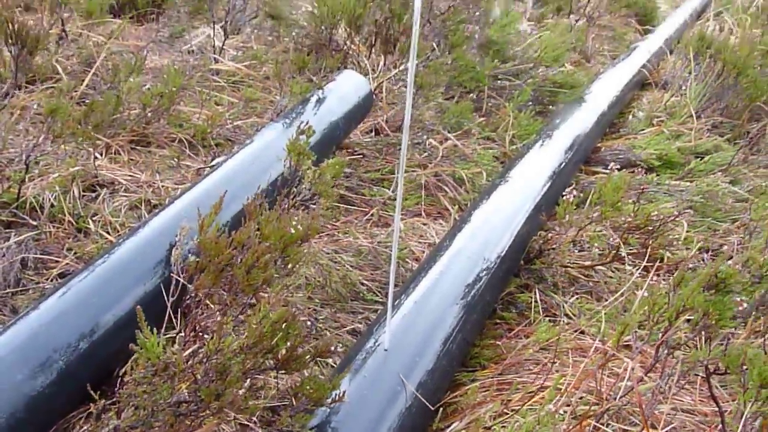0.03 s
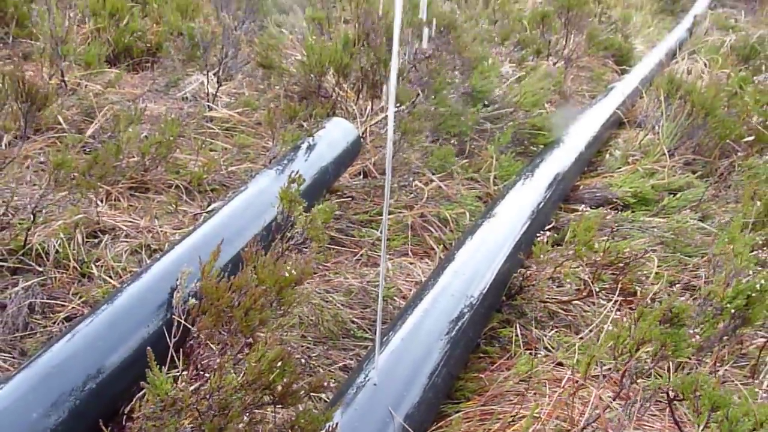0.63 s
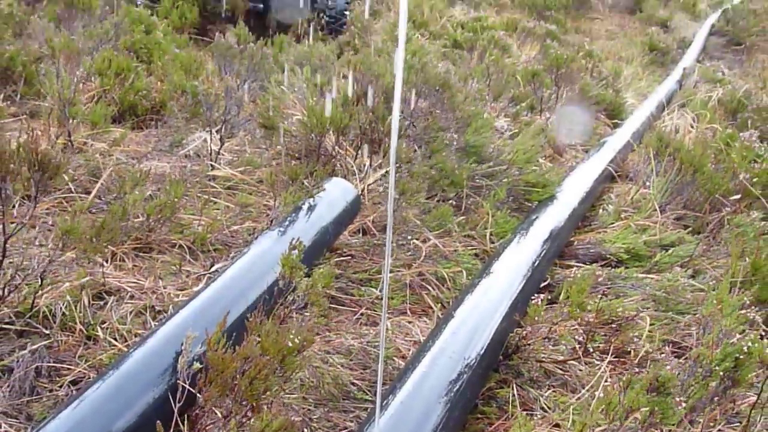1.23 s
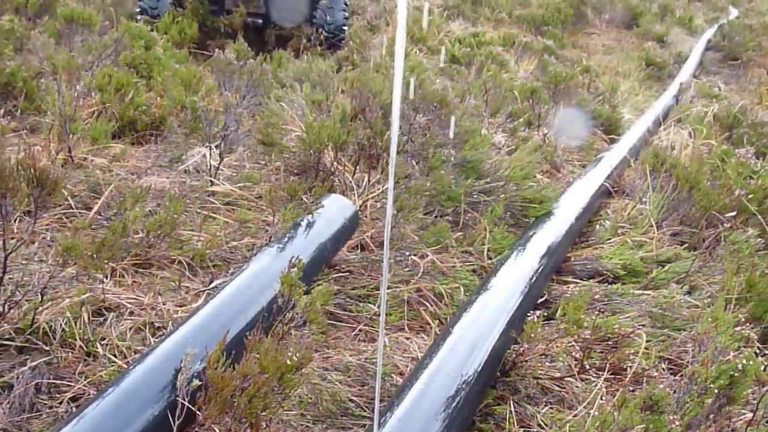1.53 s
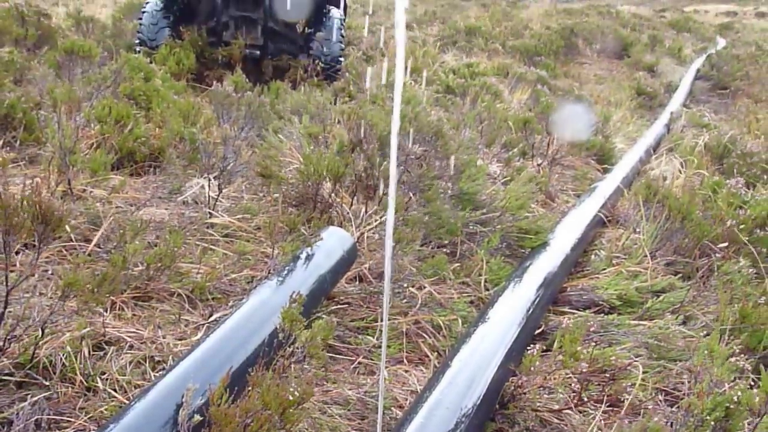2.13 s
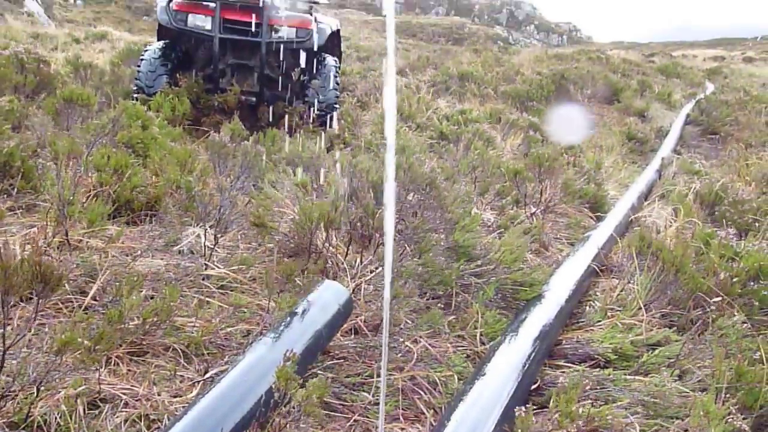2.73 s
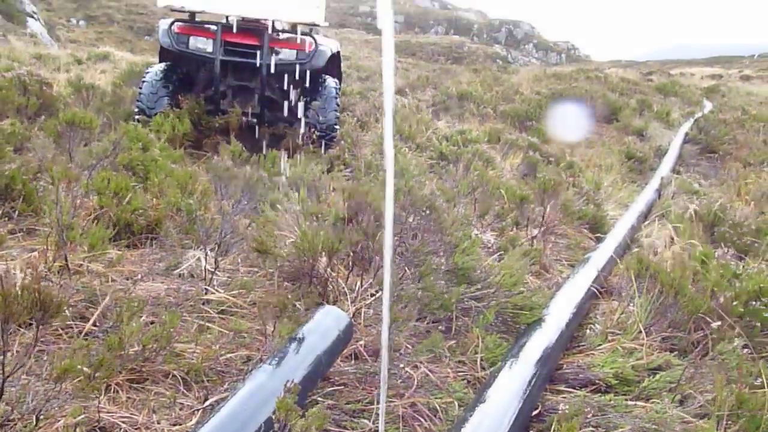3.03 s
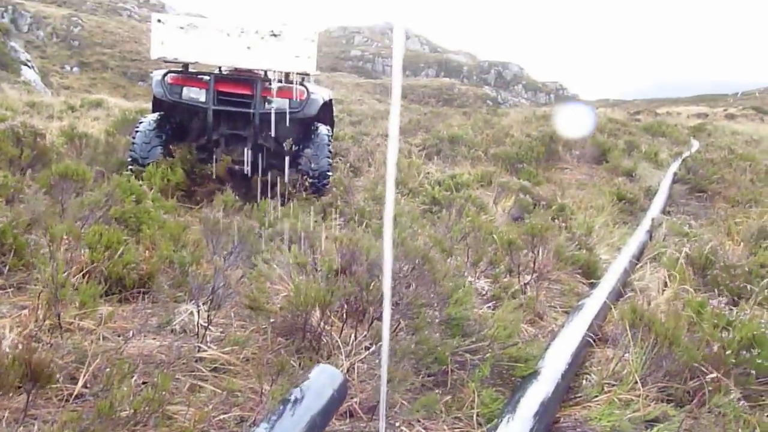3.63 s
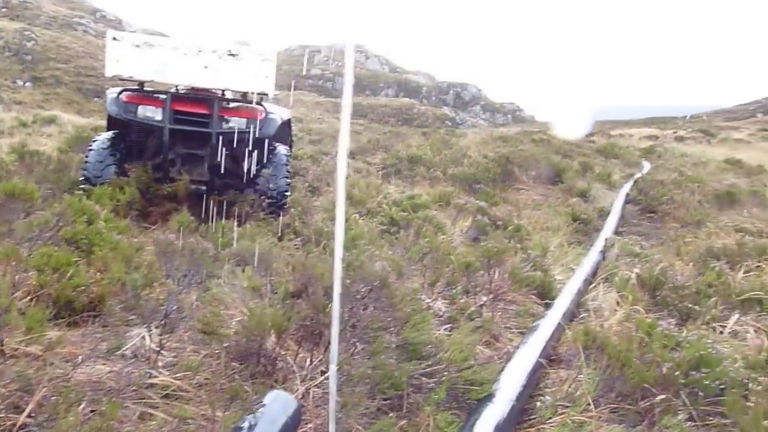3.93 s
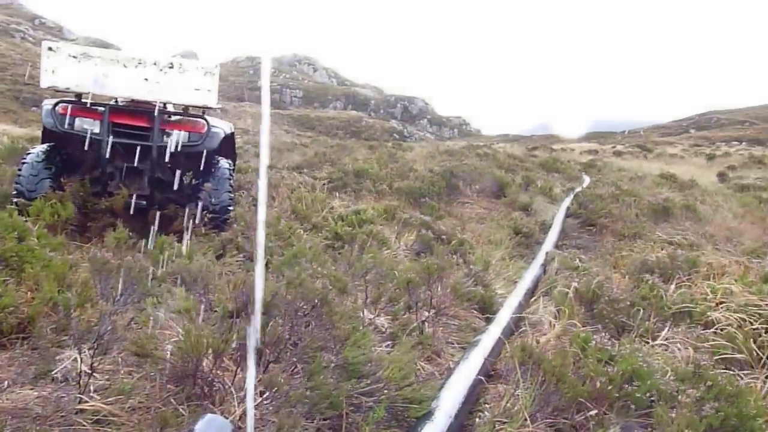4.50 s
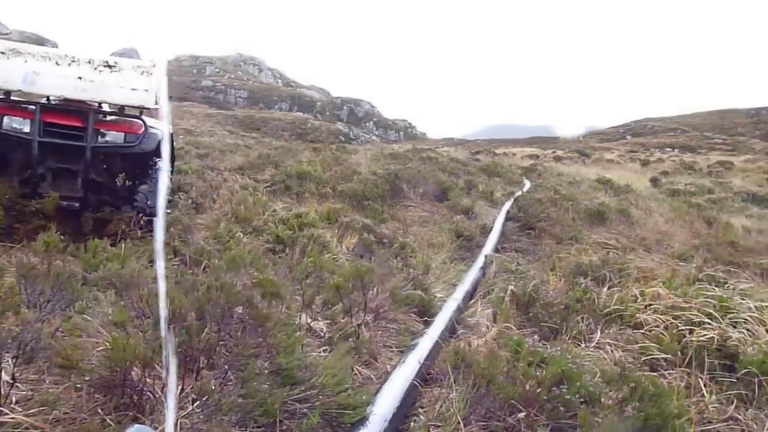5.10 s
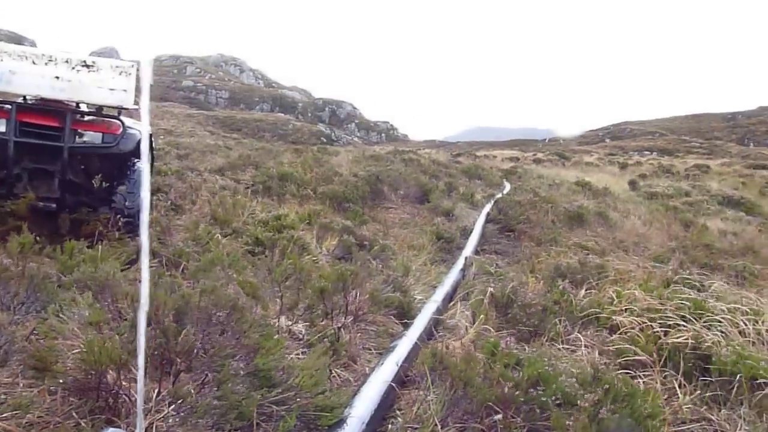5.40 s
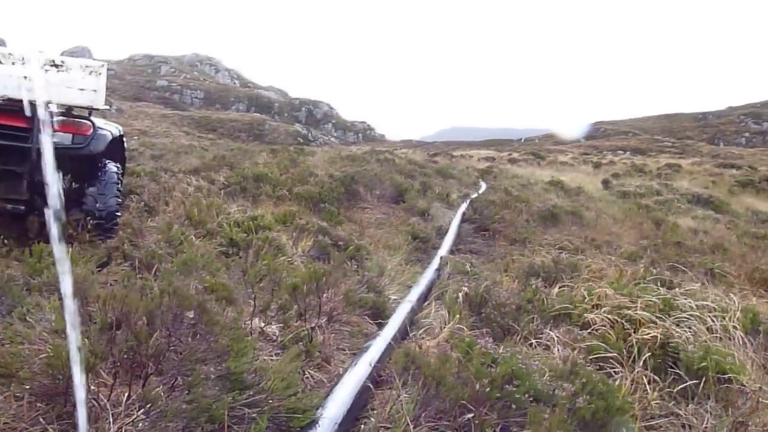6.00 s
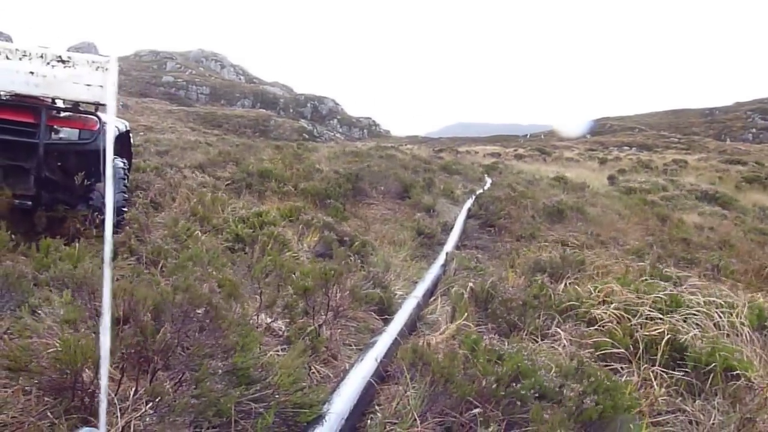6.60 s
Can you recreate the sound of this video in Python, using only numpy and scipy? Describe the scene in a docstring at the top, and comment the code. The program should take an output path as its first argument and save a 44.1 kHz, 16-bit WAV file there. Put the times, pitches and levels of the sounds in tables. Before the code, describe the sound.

Close by, water escapes from a small hole in a pipe with a faint, thin hiss, and droplets patter and tick on low plants. Near the start, trapped air bursts through in a short, squeaky sputter, and smaller spits and dull wet smacks follow later. Wind rumbles on the microphone, light at first, then in harder gusts that dominate. Distant air rushes softly across open moorland, with no echo.

```python
"""A thin hiss and a patter of drops in the wind: water jets from a holed pipe on open moorland.
The hole, close to a hand-held camera, spits and squeaks when trapped air comes through.
Spray falls back on the heather and the pipe; there are a few dull, wet smacks, and far air rushes softly.
Gusts buffet the two microphone ports, harder as the camera tilts up; narrow notches colour the treble."""
import sys
import numpy as np
from scipy import signal
from scipy.fft import rfft, irfft
from scipy.io import wavfile
from scipy.ndimage import uniform_filter1d, map_coordinates

SR = 44100
rng = np.random.default_rng(int(sys.argv[2]) if len(sys.argv) > 2 else 0)


def store_wav(level_fs):
    """Save 16-bit WAV to argv[1]."""
    pcm = np.round(np.clip(np.atleast_2d(level_fs), -1, 1) * 32767)
    wavfile.write(sys.argv[1], SR, pcm.T.astype(np.int16))


N = 297675
T = np.arange(N) / SR
HZ = np.fft.rfftfreq(N, 1 / SR)

# spectrum of a drop on wet stems (frequency [Hz], relative level [dB])
WET_STEM_SPECTRUM = [(500, -29), (1200, 3.5), (2200, 3.5), (3200, 8.5), (4300, 5.5), (5200, 7), (6200, 6.5),
                     (7300, 7), (8500, -8.5)]


def gain_of(db):
    """Decibels to amplitude."""
    return 10 ** (np.asarray(db) / 20)


def unit_rms(x):
    """Scales to an rms of one."""
    return x / np.sqrt(np.mean(x ** 2) + 1e-20)


def value_at(points, hz):
    """A spectrum's value at hz, on a log-frequency axis."""
    freqs, values = np.transpose(points)
    return np.interp(np.log(hz + 1), np.log(freqs), values)


def follow(rows):
    """A curve's value at every sample."""
    return np.interp(T, *np.transpose(rows))


def add(mix, start_s, sound):
    """Mixes a two-channel sound in at start_s."""
    part = mix[:, max(round(start_s * SR), 0):][:, :sound.shape[1]]
    part += sound[:, :part.shape[1]]


def panned(side_db):
    """Left and right gains for a level difference."""
    pair = gain_of([[side_db / 2], [-side_db / 2]])
    return pair / pair.mean()


def noise_pair(size, coherence):
    """White noise at two microphone ports that share a part of it."""
    shared, *own = rng.standard_normal((3, size))
    return np.sqrt(coherence) * shared + np.sqrt(1 - coherence) * np.array(own)


def wander(rate_hz):
    """Smooth random motion of rms one at each port, up to about rate_hz."""
    return unit_rms(irfft(rfft(rng.standard_normal((2, N))) * np.exp(-(HZ / rate_hz) ** 2), N))


def coloured(x, spectrum):
    """Passes x through a causal filter of unit energy with the given spectrum."""
    log_gain = np.log(gain_of(value_at(spectrum, abs(np.fft.fftfreq(2048, 1 / SR)))))
    taps = np.fft.ifft(np.exp(np.conj(signal.hilbert(log_gain)))).real  # minimum phase
    return signal.oaconvolve(x, unit_rms(taps)[None] / np.sqrt(len(taps)), axes=1)[:, :N]


def resonance(hz, centre_hz, boost_db, width_octaves):
    """Gain of a bell-shaped spectral peak."""
    return gain_of(boost_db * np.exp(-(np.log2((hz + 1) / centre_hz) / width_octaves) ** 2))


def swells(rows, base_db, rise_s, fall_s):
    """Level in dB of a base plus swells that rise, hold and die away."""
    power = gain_of(base_db) ** 2 * np.ones(N)
    for start, hold, db in rows:
        rise = np.clip((T - start) / rise_s, 0, 1)
        fall = np.exp(-np.maximum(T - start - hold, 0) / fall_s)
        power += (gain_of(db) * rise * fall) ** 2
    return 10 * np.log10(power)


def jet(base_db=-64, flicker_db=3.5, whistle_db=-8, whistle_hz=5000, whistle_width_hz=500):
    """Water hisses out of the hole, close to the microphone; in a surge it also whistles softly."""
    # spectrum of the hiss (frequency [Hz], relative level [dB])
    hiss_spectrum = [(1000, 0), (3000, -0.5), (4200, 2.5), (4700, 3.5), (5150, 4), (5700, 1.5), (6500, 1.5),
                     (7300, 6), (8500, -15)]
    # after a spit the hole can hiss harder for a while (start [s], hold [s], level [dB])
    surges = [(.36, 0.43, -55.5), (.83, 0.23, -58.5), (6.49, 0.28, -58)]
    flow = gain_of(swells(surges, base_db, rise_s=0.02, fall_s=0.025))
    hiss = coloured(noise_pair(N, coherence=0.23), hiss_spectrum)
    whistle = unit_rms(irfft(rfft(hiss) * np.exp(-((HZ - whistle_hz) / whistle_width_hz) ** 2), N))
    whistle *= (flow - gain_of(base_db)) * gain_of(whistle_db)
    return gain_of(flicker_db * wander(60)[0]) * (flow * hiss + whistle)


def turbulence():
    """Spectra of the churning air at the two ports; the shared part crosses between them."""
    # turbulence that both ports feel (frequency [Hz], share [0-1])
    coherence = [(30, 0.1), (100, 0.33), (300, 0.31), (700, 0.64), (1500, 0.64), (4000, 0.8)]
    # eddies crossing to the right port (frequency [Hz], phase lag [rad])
    crossing = [(30, 0), (150, -0.2), (400, 0.34), (800, 1.67), (1500, 3), (4000, 4)]
    shared, *own = rfft(rng.standard_normal((3, N)))
    share = value_at(coherence, HZ)
    lag = np.exp(-1j * np.outer([0, 1], value_at(crossing, HZ)))
    return np.sqrt(share) * shared * lag + np.sqrt(1 - share) * np.array(own)


def wind_power(port_churn_db=1.8, shared_churn_db=1.5, eddy_db=-1.5, rise_s=0.0031, fall_s=0.0055):
    """Power of the wind on each port: a churning breeze, gusts and single hard eddies."""
    # the breeze between gusts (time [s], level [dB])
    breeze = [(0, -40), (1.1, -49), (1.85, -45.5), (2.6, -32), (3.1, -45), (3.85, -39.5), (4.4, -30.5),
              (4.85, -41), (5.7, -35.5), (6.3, -30), (6.75, -22)]
    # gusts at the microphone (start [s], hold [s], level [dB])
    gusts = [(.07, 0.081, -35), (.41, 0.045, -34.5), (.73, 0.18, -36), (1.15, 0.065, -43.5),
             (1.64, 0.019, -36.5), (1.9, 0.088, -38.5), (2.03, 0.11, -28.5), (2.15, 0.24, -24),
             (2.45, 0.11, -27), (2.605, 0.072, -22.5), (2.745, 0.23, -23), (3.23, 0.39, -36.5),
             (3.39, 0.25, -32.5), (3.91, 0.11, -28.5), (4.06, 0.17, -24.5), (4.35, 0.06, -26),
             (4.57, 0.17, -27.5), (4.97, 0.12, -22), (5.17, 0.04, -21.5), (5.25, 0.24, -31),
             (5.39, 0.064, -18), (5.49, 0.11, -21), (5.62, 0.081, -26.5), (5.83, 0.14, -17.5),
             (6.05, 0.34, -22), (6.48, 0.043, -19.5), (6.56, 0.095, -17)]
    # the hardest eddies on the ports (crest time [s], relative level [dB], left minus right [dB])
    buffets = [(0.442, -19.5, -1.5), (2.120, -11, -4), (2.24, -9, 1), (2.284, -12.5, -1.5),
               (2.344, -14.5, -1.5), (2.379, -16, -2), (2.623, -11, 1.5), (2.650, -14, -9),
               (2.753, -13, 6.5), (2.778, -10, -1.5), (2.862, -6.5, -4.5), (2.948, -13, 7),
               (3.939, -23.5, 0), (4.009, -17.5, 0.5), (4.487, -18, -8), (4.685, -19.5, -16),
               (4.756, -19, -3), (5.337, -18.5, -2), (5.438, -12, 3), (5.571, -5, -1), (5.836, -16.5, 1.5),
               (6.091, -10, 0), (6.139, -14, 1.5), (6.173, -18.5, 6), (6.211, -16, 3), (6.311, -15.5, -2.5),
               (6.714, -13.5, -6)]
    churn_db = port_churn_db * wander(15.3) + shared_churn_db * wander(30)[0]
    power = gain_of(swells(gusts, follow(breeze), rise_s=0.01, fall_s=0.031) + churn_db) ** 2
    t = np.arange(-0.03, 0.05, 1 / SR)
    eddy = np.exp(-(t / np.where(t < 0, rise_s, fall_s)) ** 2 / 2)  # it hits faster than it leaves
    for crest, db, side_db in buffets:
        add(power, crest + t[0], (gain_of(db + eddy_db) * panned(side_db)) ** 2 * eddy)
    return power


def wind(firm_gust_db=-22, brighten=0.12, flutter_db_per_octave=1.75, eddy_cycles=1.42):
    """Wind on the microphone; faster air sheds smaller eddies, so it is brighter as well as louder."""
    # spectrum of a firm gust (frequency [Hz], relative level [dB])
    rumble_spectrum = [(15, -21.5), (30, -7.5), (60, 1), (110, 3), (180, 2), (280, -2.5), (450, -11.5),
                       (700, -21), (1100, -28.5), (1800, -38.5), (3000, -52.5), (7000, -78.5)]
    # eddies get finer as the camera turns into the wind (time [s], tilt about 200 Hz [dB/octave])
    fineness = [(0, -.5), (1.2, -3.5), (2.6, -0.1), (4.7, -1.8), (5.5, 1.13), (6.75, 2)]
    power = wind_power()
    air = irfft(turbulence() * gain_of(value_at(rumble_spectrum, HZ)), N)
    air /= np.sqrt(uniform_filter1d(air ** 2, size=1100))  # the wind's power alone sets the loudness
    spectrum, flutter, out = rfft(air), wander(120), np.zeros((2, N))
    centres_hz = np.geomspace(37.5, 4800, 8)
    for hz, weights in zip(centres_hz, np.eye(len(centres_hz))):
        band = irfft(spectrum * value_at(np.transpose([centres_hz, weights]), HZ), N)
        response_samples = int(eddy_cycles * SR / hz) + 1  # big eddies answer slowly
        force_db = 10 * np.log10(uniform_filter1d(power, response_samples))
        octaves_up = np.clip(np.log2(hz / 150), 0, 2.6)  # above the broad eddies
        fine_db = octaves_up * (brighten * (force_db - firm_gust_db) + flutter_db_per_octave * flutter)
        tilt_db = follow(fineness) * np.log2(hz / 200)
        out += band * gain_of(force_db + fine_db + tilt_db)
    return out


def moor(level_db=-50, swell_db=1.72):
    """The soft, even rush of wind and water far off across the moor."""
    # spectrum of the distant air (frequency [Hz], relative level [dB])
    far_spectrum = [(40, -18), (150, -20.5), (330, -4), (500, 3), (900, -1), (1400, -8), (2200, -16.5),
                    (4000, -42), (8000, -52)]
    level = gain_of(level_db + swell_db * wander(8.0)[0])
    return level * coloured(noise_pair(N, coherence=0.97), far_spectrum)


def spatter(level_db=-56, fade_db_per_s=0.38, drift_db=1.0, drops_per_s=260, spread_db=6.0):
    """Fine droplets, a few larger, land on stems of many sizes; fainter as the camera lifts."""
    # showers of fine spray coming down together (start [s], hold [s], level [dB])
    showers = [(3.3, 0.12, -52.5), (4.45, 0.15, -47.5), (5.86, .08, -52)]
    stems_hz = [2920, 3800, 5240, 5970, 6760, 7400]
    out, t = np.zeros((2, N)), T[:700]
    envelope = (1 - np.exp(-t / 0.0002)) * np.exp(-t / 0.0021)
    for hz in stems_hz:
        landings = rng.random(N) < drops_per_s / len(stems_hz) / SR
        impacts = landings * gain_of(spread_db * np.minimum(rng.exponential(1, N), 3))
        peak = resonance(HZ, hz, boost_db=12, width_octaves=0.31)
        stem_noise = irfft(rfft(noise_pair(N, coherence=0.24)) * peak, N)
        out += signal.oaconvolve(impacts, envelope)[:N] * stem_noise
    base_db = level_db - fade_db_per_s * T + drift_db * wander(4)[0]
    level = gain_of(swells(showers, base_db, rise_s=0.032, fall_s=0.02))
    return level * unit_rms(coloured(out, WET_STEM_SPECTRUM))


def drops(gain_db=-3, rise_s=0.00017, fall_s=0.0014, splash_db=-22, splash_fall_s=0.011):
    """Each drop near the microphone ticks in the pitch range of what it hits, then splashes a little."""
    # the largest drops (time [s], relative level [dB], resonance [Hz], left minus right [dB])
    landings = [(0.216, -29, 6900, -3), (.4216, -33, 6830, -1.5), (0.444, -35, 5040, 0),
                (.569, -38, 7100, -4), (.765, -36, 7000, -1), (0.791, -31.5, 7060, -3),
                (.8742, -33.5, 7000, -5), (.926, -27, 6060, -.5), (0.9819, -26.5, 5060, -2),
                (1.049, -27.5, 5700, 0), (1.123, -35.5, 7000, -5), (1.2317, -36, 4900, 2.5),
                (1.3381, -34, 6960, -2), (1.4252, -35.5, 7700, -5), (1.827, -39, 7500, -2),
                (2.132, -37, 3550, 1), (2.4116, -35, 3640, 8), (2.563, -34.5, 3380, -2),
                (2.6415, -34.5, 3700, -4), (2.9704, -32, 3550, 3), (3.061, -35, 3600, 2),
                (3.0942, -27, 5470, -2), (3.1617, -36, 3800, 3), (3.249, -29.5, 5650, 0),
                (3.3732, -38.5, 6100, 3), (3.5446, -38, 3190, -2), (3.5946, -29, 7700, -2),
                (3.6643, -36.5, 3860, -1), (3.7124, -30.5, 6000, -2), (3.965, -38, 6600, 4),
                (4.43, -23.5, 3540, 3), (4.478, -25.5, 6480, 1), (4.557, -24.5, 3130, -1),
                (5.325, -33.5, 6060, 8), (5.4455, -35, 4030, 9), (5.5705, -33, 3050, -1),
                (5.8691, -26.5, 6140, 2), (6.1088, -36, 6200, 4), (6.139, -33.5, 3270, 5),
                (6.56, -34.5, 5240, 10), (6.6873, -31.5, 4840, 8)]
    out, t = np.zeros((2, N)), T[:2048]
    hz = np.fft.rfftfreq(len(t), 1 / SR)
    splash = gain_of(splash_db) * np.exp(-t / splash_fall_s)
    envelope = (1 - np.exp(-t / rise_s)) * (np.exp(-t / fall_s) + splash)
    for start, db, centre_hz, side_db in landings:
        peak = resonance(hz, centre_hz, boost_db=10, width_octaves=0.21)
        tick = unit_rms(irfft(rfft(noise_pair(len(t), coherence=0.41)) * peak)) * envelope
        add(out, start, gain_of(db + gain_db) * panned(side_db) * tick)
    return coloured(out, WET_STEM_SPECTRUM)


def spits(gain_db=1, sputter_db=3, fall_s=0.0029):
    """Pockets of air burst through the hole in short, sputtering rasps."""
    # air pockets (start [s], length [s], relative level [dB], left minus right [dB])
    bursts = [(0.3012, 0.0027, -28, -2), (0.306, 0.016, -30, 0), (0.325, 0.036, -24.5, -1.5),
              (0.364, 0.011, -31, 3), (2.4866, 0.0065, -31, 1), (2.493, 0.013, -28, -4),
              (2.5114, 0.0046, -26.5, -2), (4.405, 0.0033, -29.5, 7), (4.415, 0.0013, -27.5, 1),
              (4.618, 0.0032, -37.5, 3), (4.779, 0.0017, -25.5, 8), (5.171, 0.0076, -29, 12),
              (6.4904, 0.0016, -30.5, 28)]
    # spectrum of the rasp (frequency [Hz], relative level [dB])
    rasp_spectrum = [(200, -14.5), (600, -12.5), (1000, -5.5), (1400, -7.5), (1900, -5), (3000, 0),
                     (4300, -3.5), (5200, 1.5), (6200, 5), (7200, 6.5), (8500, -14)]
    envelope = np.zeros((2, N))
    for start, length, db, side_db in bursts:
        t = np.arange(0, length + 0.02, 1 / SR)
        add(envelope, start, gain_of(db) * panned(side_db) * np.exp(-np.maximum(t - length, 0) / fall_s))
    sputter = gain_of(gain_db + sputter_db * wander(350)[0])
    return coloured(envelope * sputter * noise_pair(N, coherence=0.74), rasp_spectrum)


def smacks():
    """Dull, wet smacks that die quickly, some at the onset of a spit, some alone."""
    # smacks (time [s], level [dB], decay time [s])
    onsets = [(0.3075, -27.5, 0.0073), (3.393, -35, 0.0054), (3.412, -36, 0.0079), (3.428, -43, 0.0091),
              (4.417, -33.5, 0.0048), (4.6196, -25, 0.0012)]
    # spectrum of the smack (frequency [Hz], relative level [dB])
    smack_spectrum = [(300, -20), (700, 7), (1100, 9.5), (1700, -1), (2400, 4), (3900, -0.5), (5000, -15),
                      (8000, -31)]
    envelope, t = np.zeros((2, N)), T[:4000]
    for start, db, fall_s in onsets:
        add(envelope, start, gain_of(db) * panned(0) * np.exp(-t / fall_s))
    return coloured(envelope * noise_pair(N, coherence=1.0), smack_spectrum)


def squeaks(sag_octaves_per_s=9, overtone_db=-17, jitter=0.039):
    """The film of water at the hole whistles briefly as air passes, sagging in pitch."""
    # squeaks of the wet edge (start [s], length [s], starting pitch [Hz], level [dB])
    chirps = [(.311, 0.0076, 1790, -30), (.315, .01, 3860, -29.5), (.327, 0.033, 3110, -26.5),
              (.338, .005, 2160, -24.5), (.348, .015, 2380, -21), (.363, 0.01, 1010, -34),
              (2.489, 0.014, 3730, -35.5), (2.493, 0.023, 1272, -36.5), (3.411, .009, 2430, -39.5),
              (4.413, 0.0061, 2330, -32.5)]
    out, shake = np.zeros((2, N)), wander(400)[0]
    for start, length, hz, db in chirps:
        t = np.arange(0, length, 1 / SR)
        waver = 1 + jitter * np.interp(start + t, T, shake)
        pitch_hz = hz * 2 ** (-sag_octaves_per_s * t) * waver
        phase = 2 * np.pi * np.cumsum(pitch_hz) / SR
        tone = np.sqrt(2) * (np.sin(phase) + gain_of(overtone_db) * np.sin(2 * phase))
        add(out, start, gain_of(db) * panned(0) * tone * signal.windows.tukey(len(t), 0.5))
    return out


def scene():
    """Open ground gives no echo; the water reaches the far port a little later as it moves off centre."""
    # the jet drifts to the left as the camera pans (time [s], delay at the right port [s])
    right_delay = [(0, 0), (3.6, 0), (5.2, .00005), (6.75, .00007)]
    left, right = jet() + spits() + squeaks() + smacks() + drops() + spatter()
    right = map_coordinates(right, [(T - follow(right_delay)) * SR])
    return wind() + moor() + np.array([left, right])


def record(dry):
    """The camera clips at full scale; narrow notches and a low band limit shape the treble."""
    # the camera's notch filters (frequency [Hz], width [Hz])
    notches = [(2610, 760), (4610, 426), (5420, 340), (7900, 160), (8100, 71)]
    x = np.clip(dry, -1, 1)
    for hz, width_hz in notches:
        x = signal.lfilter(*signal.iirnotch(hz, hz / width_hz, fs=SR), x)
    lowpass = signal.firwin(121, cutoff=8800, window=("kaiser", 9), fs=SR)
    return signal.oaconvolve(x, lowpass[None], "same")


dry = scene()
out = record(dry)
store_wav(out)
```